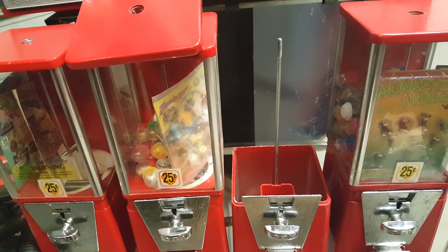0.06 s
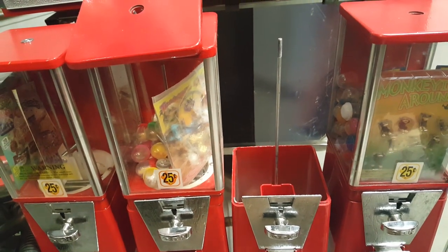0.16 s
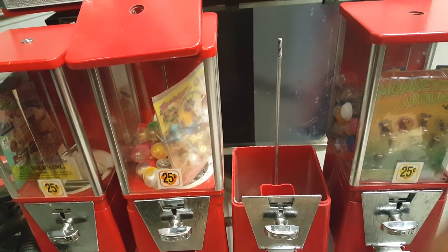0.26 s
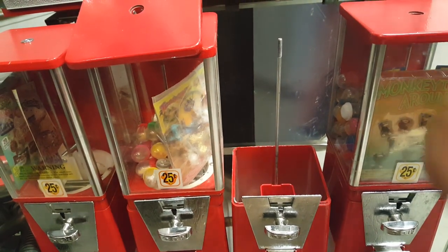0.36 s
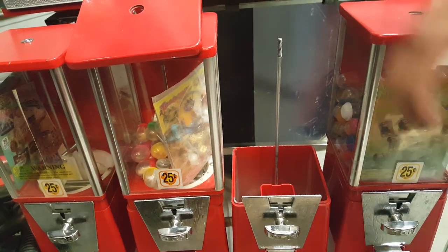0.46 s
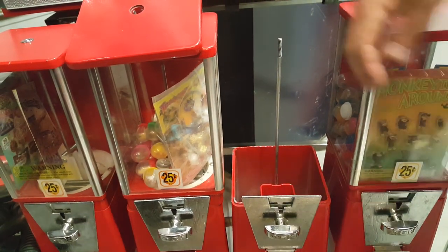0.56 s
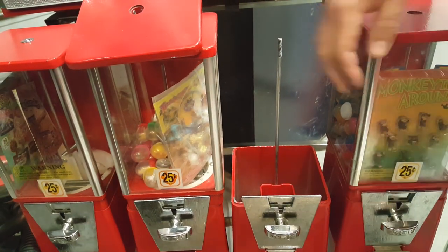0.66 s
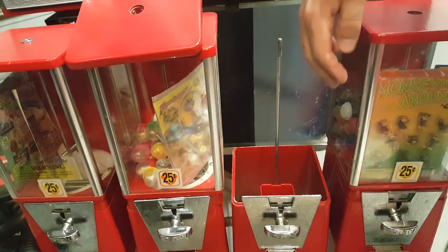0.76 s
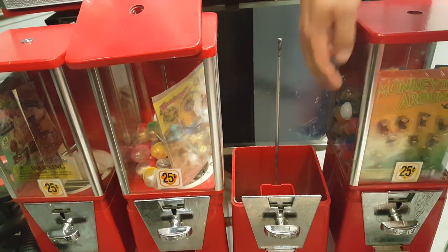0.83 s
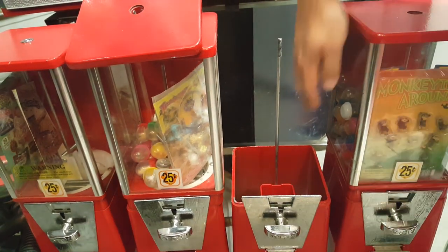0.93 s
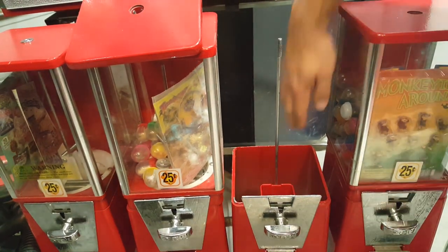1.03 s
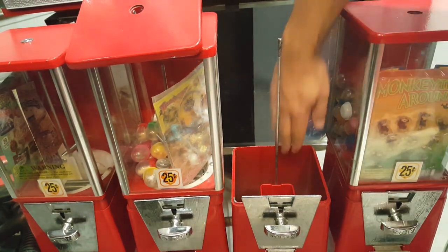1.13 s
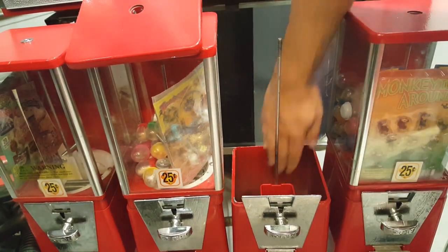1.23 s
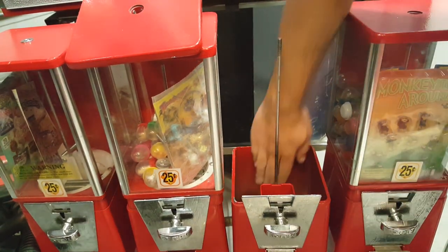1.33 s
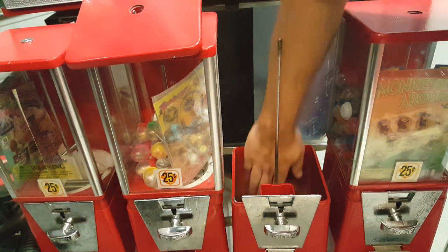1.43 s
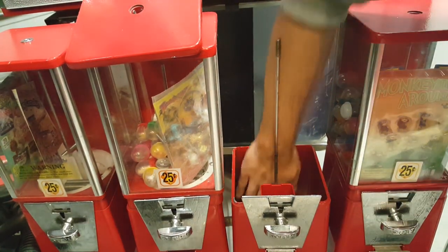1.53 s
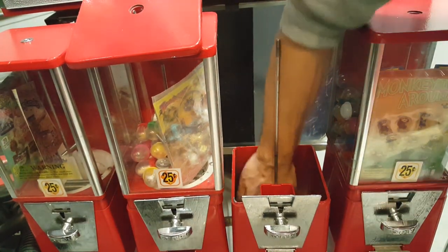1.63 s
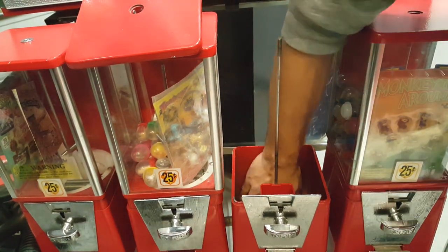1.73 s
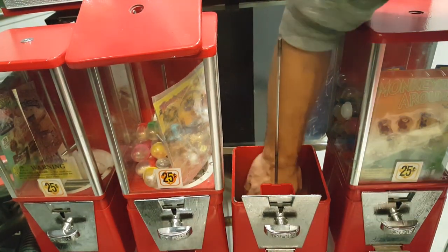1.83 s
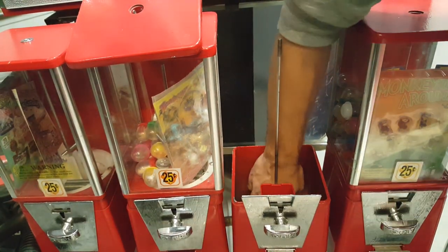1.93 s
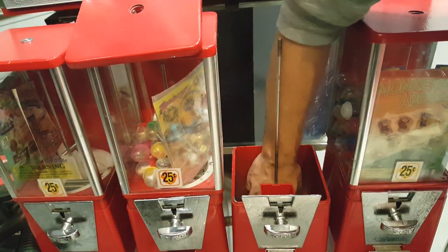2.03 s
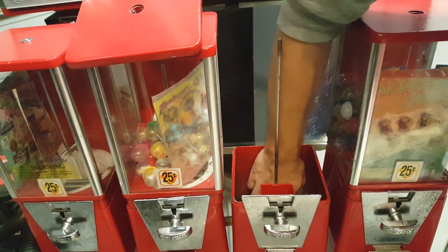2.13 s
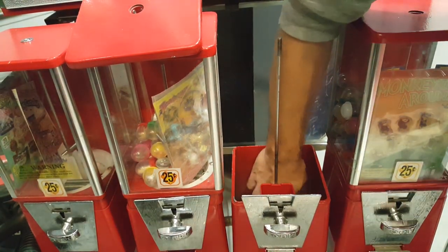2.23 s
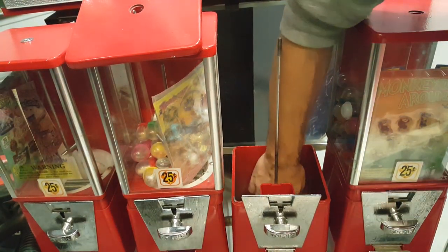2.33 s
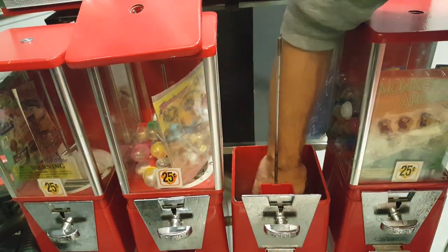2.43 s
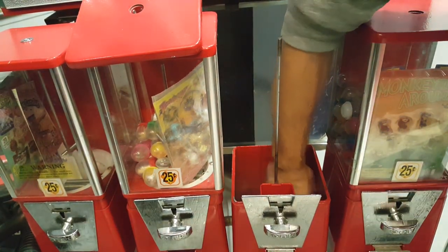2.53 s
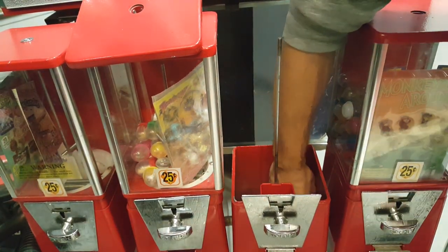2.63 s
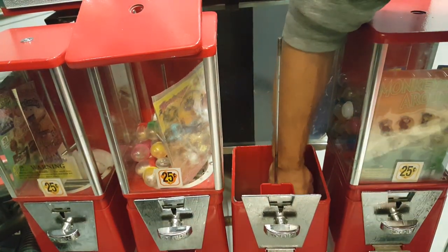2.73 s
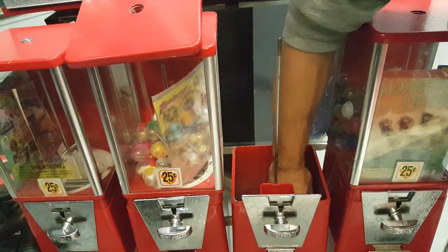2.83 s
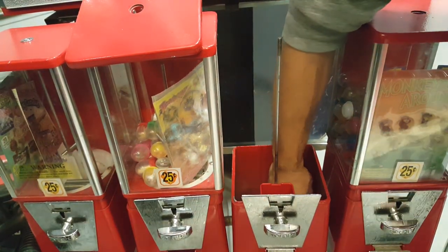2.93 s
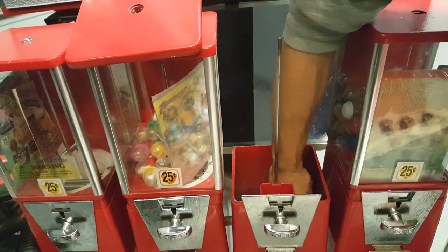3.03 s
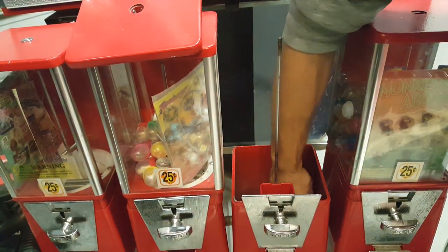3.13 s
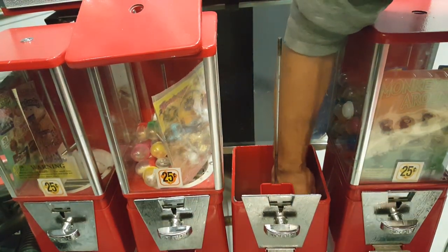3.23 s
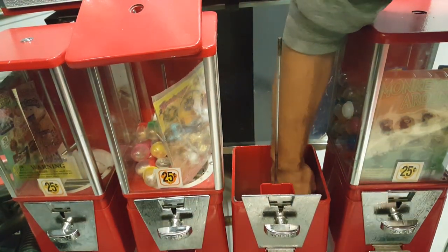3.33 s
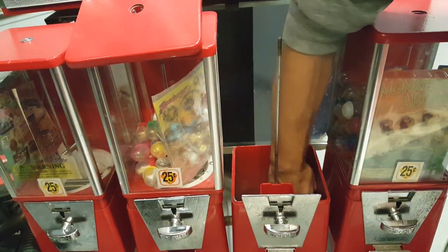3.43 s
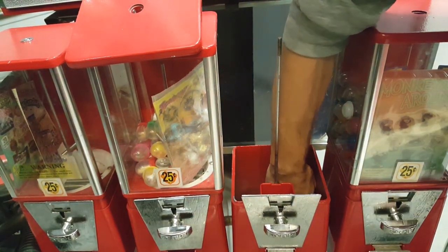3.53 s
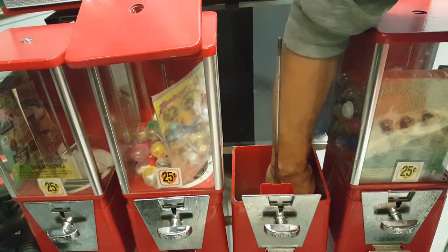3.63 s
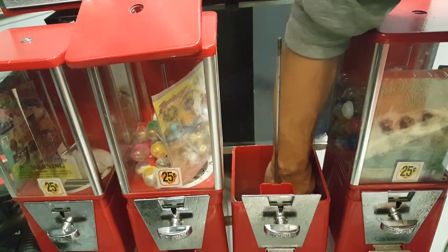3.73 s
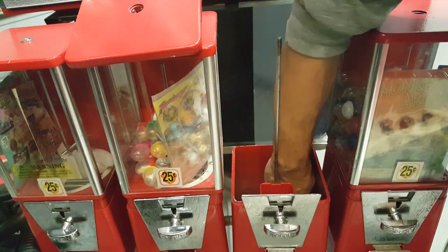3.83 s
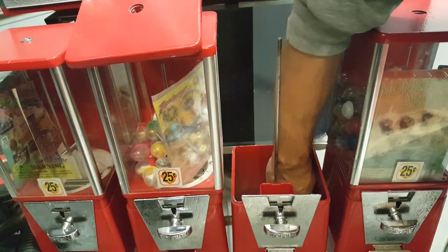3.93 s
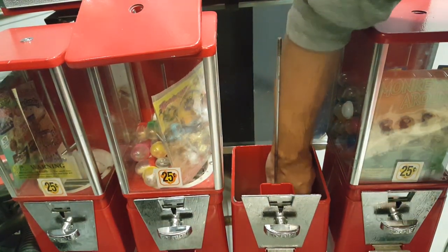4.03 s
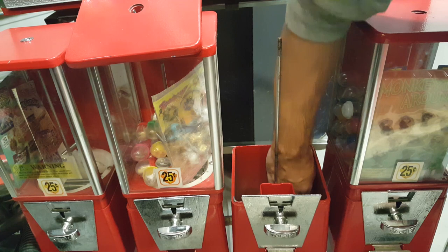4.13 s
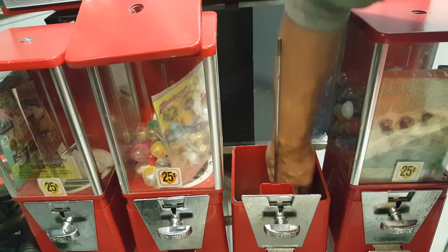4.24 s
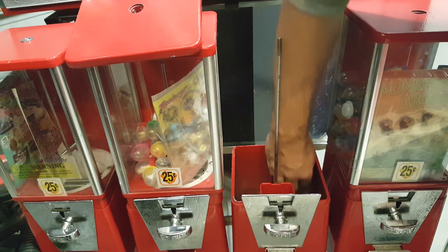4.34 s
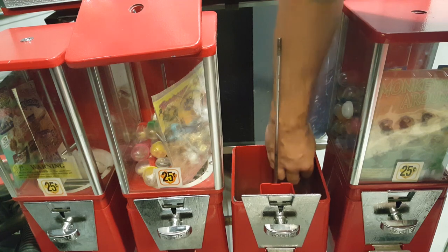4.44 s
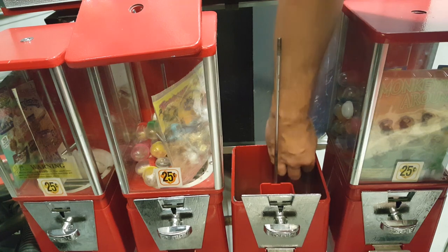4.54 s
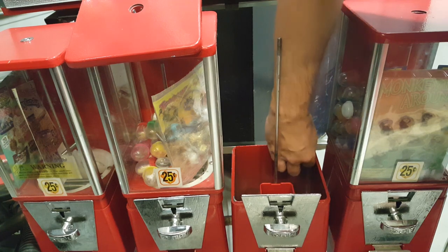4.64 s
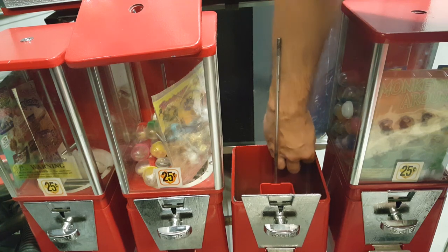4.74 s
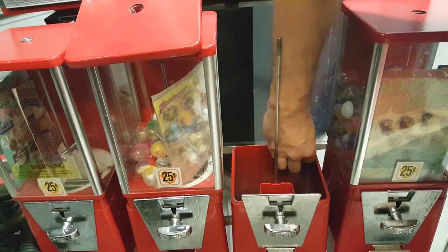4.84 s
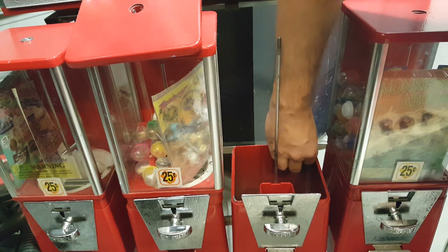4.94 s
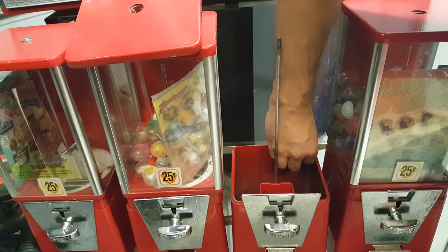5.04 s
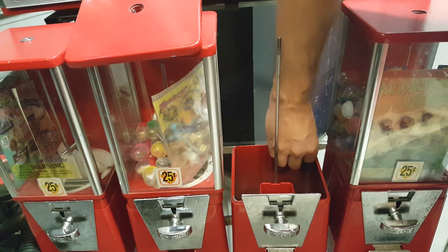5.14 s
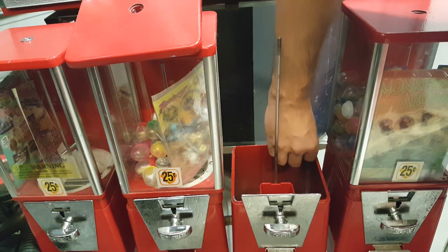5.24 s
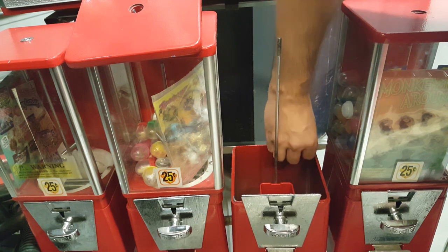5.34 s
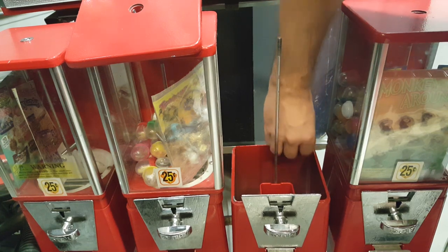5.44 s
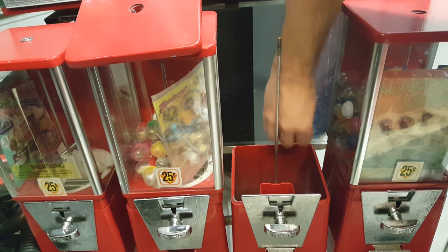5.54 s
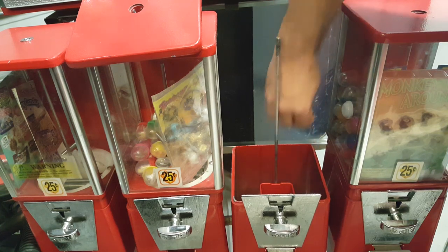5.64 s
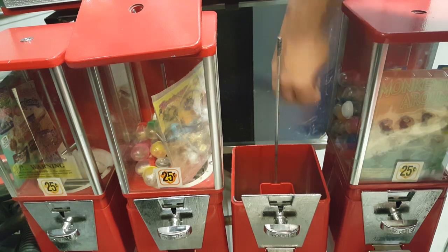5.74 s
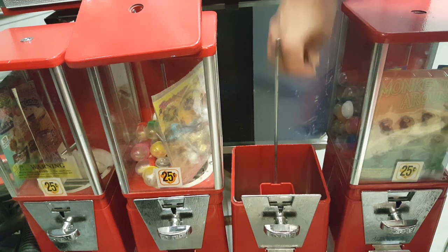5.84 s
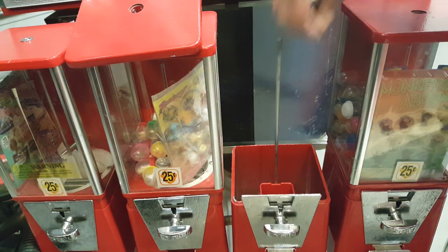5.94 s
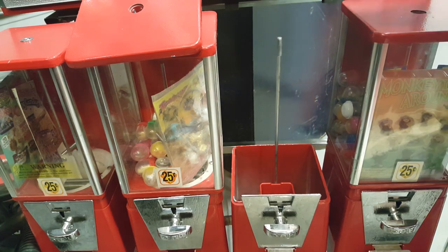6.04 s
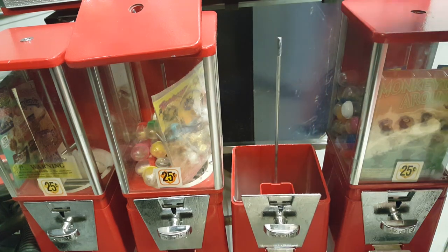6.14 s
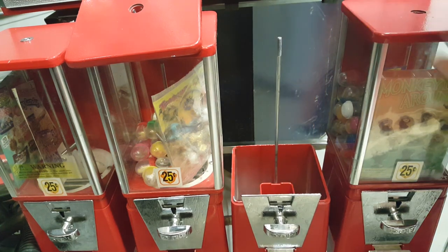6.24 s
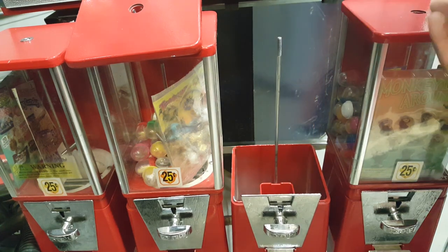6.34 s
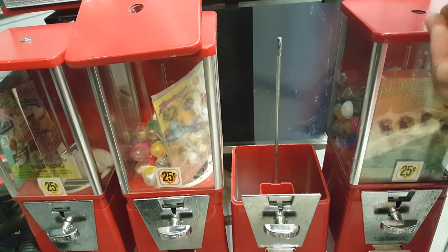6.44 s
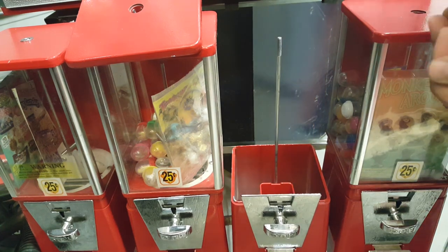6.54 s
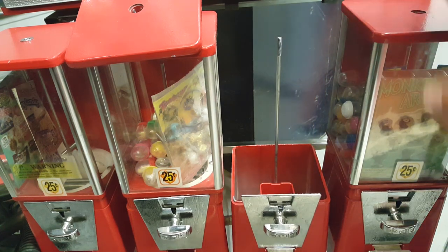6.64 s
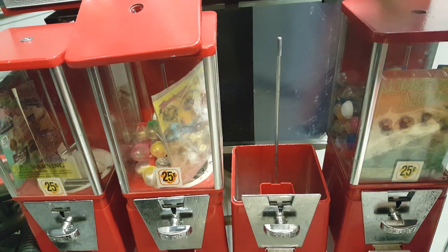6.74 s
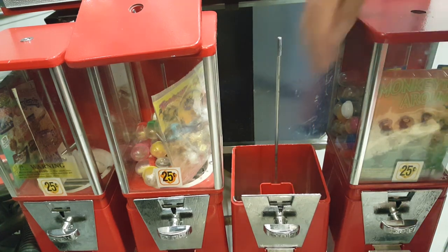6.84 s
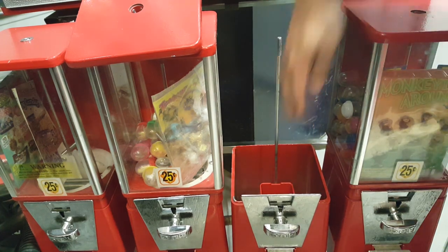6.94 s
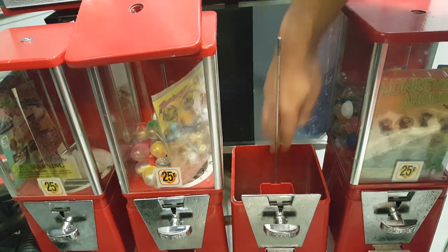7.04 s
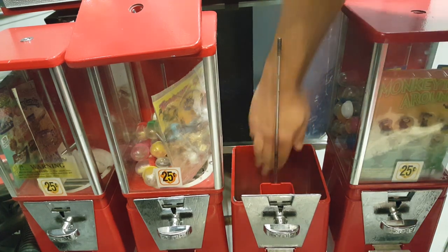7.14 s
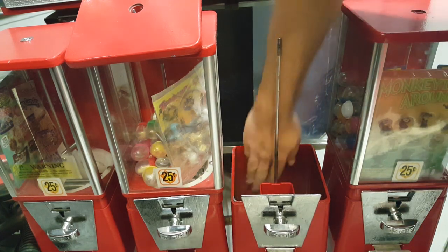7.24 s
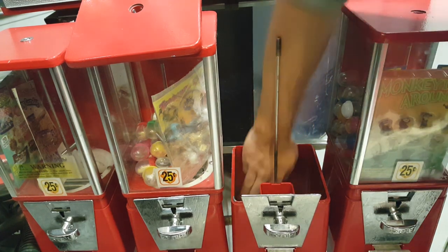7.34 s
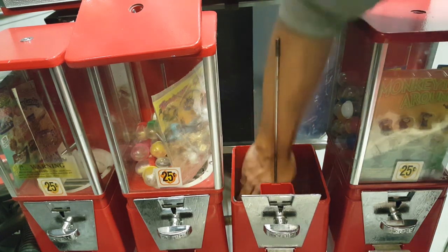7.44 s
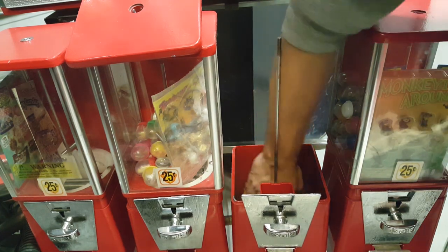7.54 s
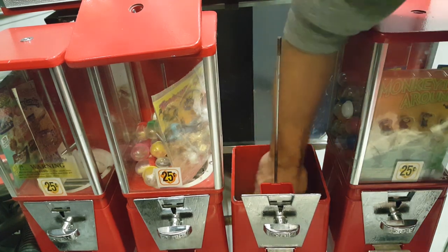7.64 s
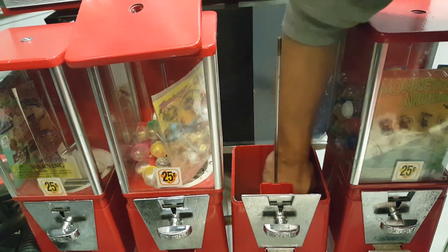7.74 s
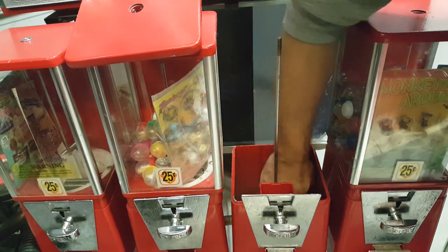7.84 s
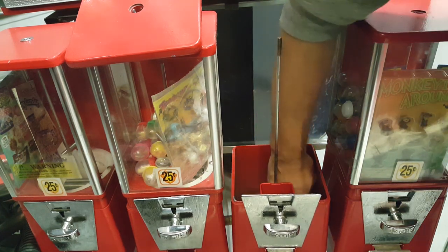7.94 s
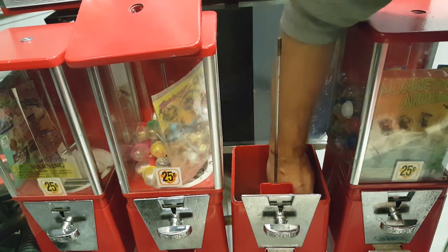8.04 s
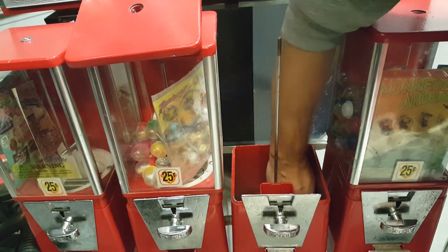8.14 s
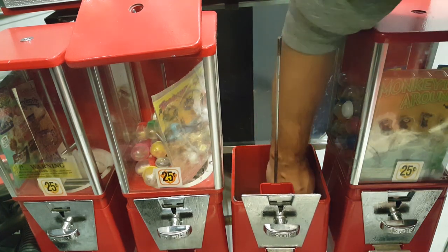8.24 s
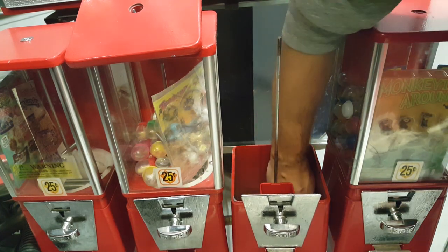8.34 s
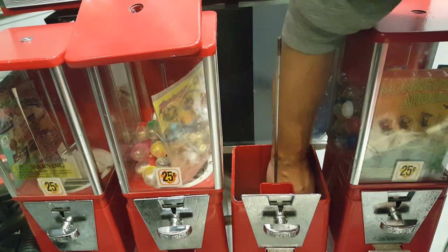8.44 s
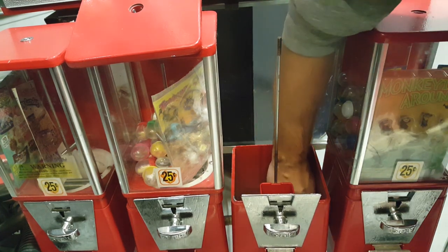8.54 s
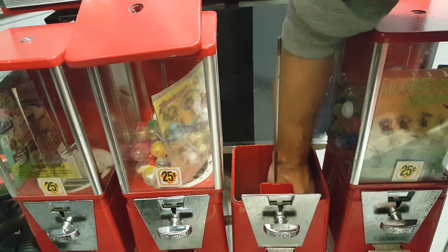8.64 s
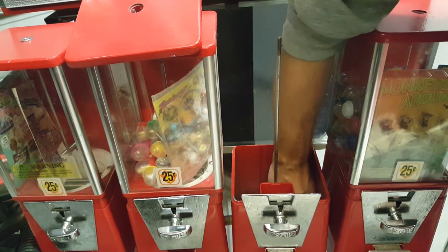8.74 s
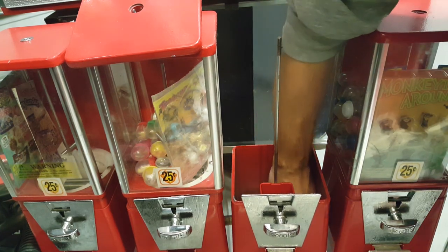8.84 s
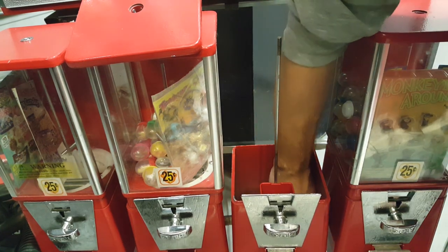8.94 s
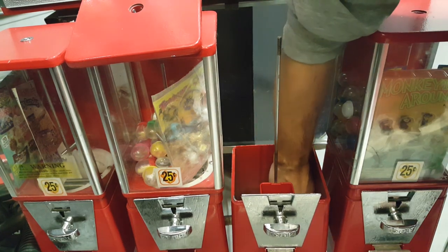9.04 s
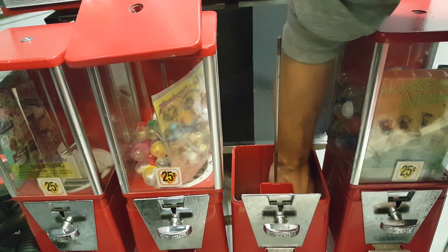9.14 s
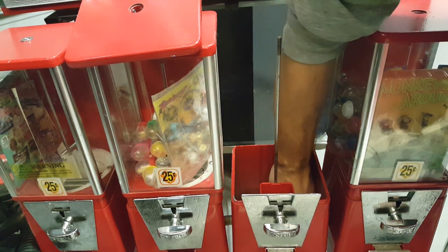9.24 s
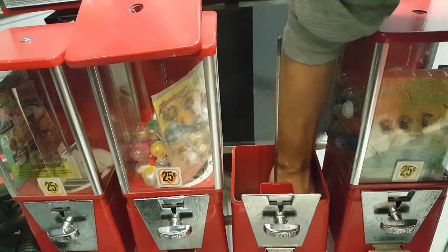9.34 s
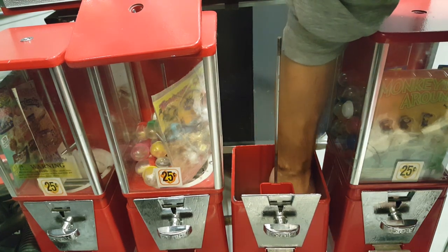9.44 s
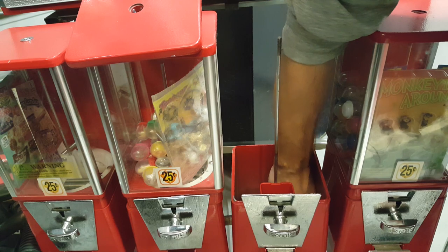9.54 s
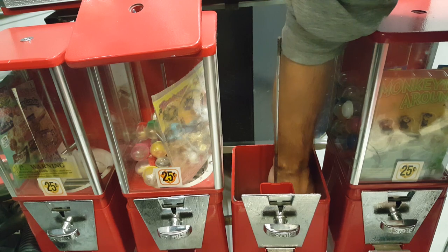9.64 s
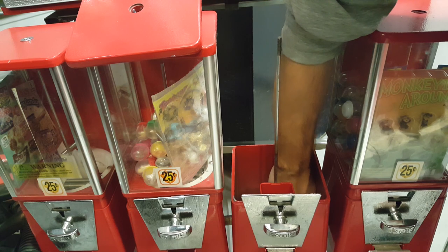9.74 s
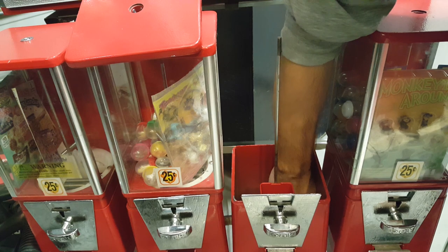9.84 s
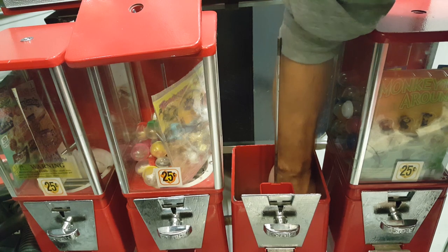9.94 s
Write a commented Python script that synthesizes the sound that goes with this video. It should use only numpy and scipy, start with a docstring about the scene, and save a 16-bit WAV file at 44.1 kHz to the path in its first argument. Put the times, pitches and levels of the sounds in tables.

```python
"""Raking coins in a vending machine

A hand rakes coins in a plastic hopper: each push swells, then the pile settles. A fistful rises, is dumped into
a tub, a few loose coins jingle, and the hand digs in again. Noise bursts with short tones make damped contacts;
streams and blows of them drive resonant bodies. Free coins and a brushed rod ring as decaying sines; cloth
rustles and whistles, soft bumps thud, and faint room air lies beneath."""
import sys
import numpy as np
from scipy import signal
from scipy.fft import rfft, irfft, next_fast_len
from scipy.io import wavfile
from scipy.ndimage import uniform_filter1d, minimum_filter1d, map_coordinates

SR = 44100
rng = np.random.default_rng(int(sys.argv[2]) if len(sys.argv) > 2 else 0)


def dump(signal):
    """Clip the signal to [-1, 1] and save it as 16-bit WAV at the path in sys.argv[1]."""
    limited = np.clip(np.atleast_2d(signal).T, -1, 1)
    pcm = np.round(limited * 32767).astype(np.int16)
    wavfile.write(sys.argv[1], SR, pcm)


N = 440118
TIME = np.arange(N) / SR  # seconds


def amp(db):
    """Decibels to gain."""
    return 10 ** (np.asarray(db) / 20)


def unit(x):
    """Scale to rms 1."""
    return x / np.sqrt(np.mean(x ** 2) + 1e-20)


def along(points, hz):
    """Interpolate (Hz, value) points on a log frequency axis."""
    f, value = np.transpose(points)
    return np.interp(np.log(hz + 1), np.log(f + 1), value)


def add(track, s, sound):
    """Mix a sound into a track at time s, cut off at the track's end."""
    part = track[..., max(0, round(s * SR)):][..., :sound.shape[-1]]
    part += sound[..., :part.shape[-1]]


def curve(times, db):
    """Gain following a dB curve, silent outside its span."""
    return amp(np.interp(TIME, times, db, left=-150, right=-150))


def hopper():
    """Hand and raked coins drum on the hopper; its resonances shift as the hand turns in it and rises out of it."""
    # coins snapping against the pile, and the hand touching or knocking on the hopper:
    # t/s, relative edge level/dB, drumming over the edge/dB, centre pitch of the clack f/Hz
    clacks = [(1.336, -27, -10, 1500), (1.7423, -18, -17, 1480), (1.8543, -9, -12, 2320),
              (1.9, -12, -14, 1170), (2.0317, -4.5, -10.5, 570), (2.1864, -9, -7, 1560),
              (2.276, -11.5, -17, 423), (2.3478, -18, -9.5, 1590), (2.4181, -8, -6, 850),
              (2.5393, 8.5, -10.5, 565), (2.7239, -17.5, -20, 1657), (2.7899, -17, -10, 2280),
              (2.831, -17, -11.5, 2130), (2.9089, -13.5, -11, 2580), (2.9311, -4, -8, 2480),
              (3.0176, -14.5, -12, 2326), (3.074, -16.5, -9, 1430), (3.1345, -9, -6.5, 2350),
              (3.1842, 2, -10, 1354), (3.4036, -23.5, 0, 1480), (3.702, -7.5, -4, 1375),
              (3.754, -10.5, -14, 1520), (3.8097, -16, -13, 1660), (3.8533, -7.5, -8.5, 1612),
              (3.912, -14, -2, 1463), (4.0726, -14.5, -34, 1600), (4.269, -10, -12.5, 1540),
              (4.578, -31.5, -11, 1620), (4.677, -37, -5, 1720), (4.8135, -26.5, -6.5, 2480),
              (4.967, -47, 2, 2850), (5.0, -40, 2.5, 2860), (5.064, -50.5, 10.5, 2530),
              (5.229, -51, 8.5, 890), (5.2616, -49.5, 6.5, 1770), (5.324, -51.5, 18.5, 584),
              (5.468, -50.5, 10.5, 2390), (7.1623, -39.5, -36, 3020), (7.213, -38.5, -26, 2280),
              (7.517, -42, 14.5, 1660), (7.566, -39.5, 12, 2280), (7.645, -17, -9.5, 1780),
              (7.6939, -16, 6, 1420), (7.908, -18, -9, 1520), (7.9744, -11.5, -10.5, 1537),
              (8.0168, -16, -7.5, 2240), (8.0453, -20.5, -14, 1980), (8.2155, -19.5, -0.5, 1720),
              (8.2626, -18, -6, 1320), (8.298, -21, -5, 2560), (8.3125, -2, -5.5, 2660),
              (8.6363, -15, 3.5, 2100), (8.6694, -11, -4, 1424), (8.7063, 3, -8, 2010),
              (8.9434, -18.5, -10, 1400), (9.0121, -6, -6.5, 2360), (9.2239, -16, -28, 1310),
              (9.268, -12.5, -15.5, 1590), (9.2865, -12.5, -20, 2760), (9.405, -37.5, 7.5, 1700),
              (9.4868, -17, -12, 1440), (9.5127, -27, 2.5, 1420), (9.5461, -17, -3.5, 1634),
              (9.574, -18.5, -5, 2680), (9.6395, -31, -16, 1470), (9.701, -24.5, -10, 1470),
              (9.728, -29, 3, 380), (9.7669, -17.5, -12, 1370), (9.7936, -11.5, -10.5, 1500),
              (9.8754, -14.5, -8, 1340), (9.919, -17, -9, 1570)]
    # broad colour of the coin pile: f/Hz, relative density/dB
    pile = [(30, -58.5), (90, -30.5), (280, -14), (1000, -27), (2500, -12), (4000, -14), (9000, -13),
            (12000, -13), (14500, -22.5), (16000, -27)]
    # cavity resonances with the hand deep in the hopper: f/Hz, width/Hz, relative level/dB
    deep_modes = [(385.6, 30, 0), (553, 31.6, -1), (861.6, 67, -1.5), (1400, 202, -1), (2020, 180, -10.5),
                  (2526, 380, -8.5), (5370, 210, -15.5), (6620, 220, -15.5)]
    # resonances with the fist raised: the cavity's, and two high rings of the held coins:
    # f/Hz, width/Hz, relative level/dB
    raised_modes = [(389, 88, 11), (572.6, 31, 17), (1150, 88, 4), (1543, 200, 4), (1690, 63, 4),
                    (2393, 79, 0), (2740, 180, -1.5), (3745, 74, -1), (6900, 40, -2), (11150, 38, -5)]
    # how far the fist is raised: t/s, share/0-1
    lift_points = [(3.4, 0.3), (3.9, 0.27), (4.5, 0.99), (5.6, 1), (7, 0)]
    raised_cut_hz = 470

    drum, edge = raking()
    stream = clatter(rate=440, spread_db=18, evenness=.7, clack_db=-7, ring_db=-3, scatter_db=-12)
    knock, snap = blows(clacks, t60=0.0088, clack_db=-10.0, rebound_db=-2.0, rebound_s=.002)
    low = amp(-2.5) * drum * stream + amp(20.0) * knock
    high = amp(-4) * edge * stream + amp(15.0) * snap
    # the turning hand covers more or less of the opening and detunes the cavity
    deep = gliding(low, high, body(pile, deep_modes))
    # coins lifted off the bottom no longer thump the hopper
    unloaded = signal.butter(2, raised_cut_hz, "high", fs=SR, output="sos")
    raised = sounded(low, high, signal.sosfilt(unloaded, body(pile, raised_modes)))
    lift = np.interp(TIME, *np.transpose(lift_points))
    return (1 - lift) * deep + lift * raised


def raking():
    """Drumming and edge gain of the moving coins: the strokes, the creeping pile and the held fistful."""
    # strokes and jolts of the hand among the coins:
    # start t/s, length of the push/s, relative drumming level at the crest/dB, coin edge over the drumming/dB
    strokes = [(1.738, 0.026, -29.5, 6), (1.845, 0.018, -27.5, 3.5), (1.9, 0.01, -18.5, 4),
               (1.95, 0.16, -25.5, 1), (2.18, 0.18, -26, 2.5), (2.4, 0.058, -18, 1.5),
               (2.52, 0.068, -21, 7), (2.932, 0.017, -29.5, -2), (3.118, 0.1, -21, 7),
               (3.4, 0.14, -25.5, 2.5), (3.57, 0.13, -39, 9), (3.68, 0.027, -21.5, 0.5),
               (3.81, 0.067, -23, 0), (3.94, 0.07, -22.5, -3.5), (4.15, 0.14, -22.5, -4),
               (4.32, 0.063, -24.5, -5.5), (7.643, 0.15, -18.5, 2.5), (8.18, 0.099, -29.5, -5),
               (8.313, 0.078, -16, 2), (8.7, 0.052, -13.5, 0.5), (8.943, 0.028, -23.5, 1.5),
               (9.01, 0.021, -19, 6), (9.12, 0.058, -31, 0), (9.245, 0.016, -28.5, 0),
               (9.49, 0.058, -32, -9), (9.728, 0.085, -30, -9), (9.873, 0.083, -30, -1)]
    # coins shifting in the closed fist as it rises: t/s, relative drumming level/dB
    fist = [(4.42, -41), (4.67, -39), (4.774, -51), (5.1, -61), (5.38, -55.5), (5.518, -70.5), (5.62, -82)]
    # between strokes the buried hand keeps the pile creeping: start t/s, stop t/s, relative level/dB
    creeping = [(1.76, 4.416, -42.5), (7.65, 9.98, -55)]
    fist_edge_db = -18.5  # the fingers muffle the coin edges

    held = curve(*np.transpose(fist))
    creep = sum(amp(db) * (TIME > start) * (TIME < stop) for start, stop, db in creeping)
    stroke_gains = pushes(strokes, catch_s=0.0032, swell_db=9, settle_db_per_s=184)
    return np.hypot(stroke_gains, creep) + held * amp([[0], [fist_edge_db]])


def pushes(table, catch_s, swell_db, settle_db_per_s):
    """Bass and treble gain of a run of strokes: each catches, swells to its crest and dies away."""
    power = np.zeros((2, N))
    t = TIME[:SR]
    for start, length, db, treble_db in table:
        swell = swell_db * (t / length - 1)
        settle = settle_db_per_s * (length - t)
        levels = np.minimum(swell, settle) + [[db], [db + treble_db]]
        catch = np.minimum(t / catch_s, 1)
        add(power, start, (catch * amp(levels)) ** 2)
    return np.sqrt(power)


def contact(t60, ring_db=-9, clack_db=-9, clack_hz=None, scatter_db=-9, count=6):
    """One damped contact: a crack scattered by the pile, the pitched clack of a stack, the brief ring of its coins."""
    t = np.arange(SR // 10) / SR
    # every coin is held differently, so each crack has its own broad peaks and dips
    colour = rfft(rng.standard_normal(len(t)))
    patches = np.interp(np.linspace(0, 1, len(colour)), np.linspace(0, 1, 26), rng.standard_normal(26))
    burst = irfft(colour * amp(4 * patches), len(t))
    # the first crack is bright; what the pile scatters after it has lost some of its top
    scatter = uniform_filter1d(burst, size=2) * amp(scatter_db - 60 * t / .06)
    crack = burst * amp(-60 * t / t60) + scatter
    rise = 1 - np.exp(-t / .0012)

    ring_hz = rng.uniform(2200, 14000, (count, 1))
    partials = rng.standard_normal((count, 1)) * np.sin(2 * np.pi * ring_hz * t)
    ring = partials.sum(0) * amp(-60 * t / .06)

    stack_hz = 1450 * 4 ** rng.random()
    pitch = (clack_hz or stack_hz) * np.exp(.06 * rng.normal())
    clack = np.sin(2 * np.pi * pitch * t) * amp(-60 * t / .035)
    sound = unit(rise * crack) + amp(ring_db) * unit(rise * ring) + amp(clack_db) * unit(rise * clack)
    return sound / np.linalg.norm(sound)


def clatter(rate, spread_db, evenness, clack_db, ring_db, scatter_db=-9, count=160):
    """A stream of random contacts (rate per second) of unequal strength among many coins, rms 1."""
    coins = [contact(.014, ring_db, clack_db, scatter_db=scatter_db) for _ in range(count)]
    draws = rng.random((12000, 3))
    times = np.cumsum(-np.log(1 - draws[:, 0])) / rate  # exponential waits
    stream = np.zeros(N)
    for s, (_, strength, which) in zip(times[times < N / SR], draws):
        add(stream, s, amp(spread_db * strength ** 2) * coins[int(which * count)])
    # the hand's steady push evens out the flow over tens of milliseconds
    flow = np.abs(uniform_filter1d(unit(stream) ** 2, size=1800)) + .02
    return unit(stream / flow ** (evenness / 2))


def blows(table, t60, clack_db, rebound_db, rebound_s, count=4):
    """Drumming and edge drives of single blows, each followed by quick rebounds."""
    drive = np.zeros((2, N))
    for s, db, drum_db, *pitch in table:
        blow = np.zeros(SR // 6)
        delays = np.cumsum(rng.uniform(.5, 2, count)) * rebound_s
        # flat, drumming blows are more pitched than edge-on ones
        tone_db = clack_db + 0.043 * drum_db
        clack_hz = pitch[0] if pitch else None
        for k, delay in enumerate(delays - delays[0]):
            hit = contact(t60, clack_db=tone_db, clack_hz=clack_hz)
            add(blow, delay, amp(k * rebound_db) * hit)
        add(drive, s, amp([[db + drum_db], [db]]) * blow / np.linalg.norm(blow))
    return drive


def body(spectrum, modes=(), size=8192):
    """Causal impulse response of a broad spectrum with resonances on it, energy 1."""
    hz = np.fft.rfftfreq(size, 1 / SR)
    power = amp(along(spectrum, hz)) ** 2
    for centre, width, db in modes:
        damping = hz * width
        power = power + (amp(db) * damping) ** 2 / ((centre ** 2 - hz ** 2) ** 2 + damping ** 2)
    # folding the cepstrum makes the response minimum-phase, so it starts at once
    cepstrum = irfft(np.log(power) / 2)[:size // 2]
    cepstrum[1:] *= 2
    response = irfft(np.exp(rfft(cepstrum, size)))[:size // 2]
    return response / np.linalg.norm(response)


def sounded(low, high, response, split_hz=3300):
    """Drive the bass and the treble of a body separately, each at unit power gain."""
    out = 0
    for drive, side in ((low, "low"), (high, "high")):
        half = signal.butter(2, split_hz, side, fs=SR, output="sos")
        part = signal.sosfilt(np.vstack([half, half]), response)
        out = out + signal.oaconvolve(drive, part / np.linalg.norm(part))[:N]
    return out


def gliding(low, high, response):
    """Sound a cavity whose resonances wander: it rings on a clock that runs a little fast or slow."""
    samples = np.arange(N)
    turn = .03 * np.tanh(map_coordinates(rng.standard_normal(99), [TIME * 9]))
    clock = np.cumsum(1 + turn - turn.mean())
    # warp the drives the opposite way, so the blows keep their times
    unwarped = np.interp(samples, clock, samples)
    drives = [map_coordinates(drive, [unwarped]) for drive in (low, high)]
    return map_coordinates(sounded(*drives, response), [clock])


def tub():
    """The fistful lands in a rush on the coins in a hollow tub; hollow knocks sound through the same body."""
    # the fistful pouring in: t/s, relative tub drumming level/dB, relative coin edge level/dB
    pour = [(5.78, -62, -79), (5.992, -28.5, -43.5), (6.0, -21, -22.5), (6.05, -20, -28.5),
            (6.2, -45.5, -54.5), (6.335, -68, -65)]
    # hollow knocks: the hand touching the hopper early on, then coins landing in the tub:
    # t/s, relative edge level/dB, drumming over the edge/dB
    hollow_knocks = [(1.3494, -22.5, 7), (5.931, -29, 12), (5.964, -22, 9), (5.9923, -7, -1),
                     (6.0228, -13.5, 5), (6.114, -22.5, 6)]
    # broad colour of coins in the tub: f/Hz, relative density/dB
    tub_pile = [(30, -35.5), (150, -38), (300, -9.5), (600, -5), (1500, -13), (3500, -21), (9000, -25.5),
                (12000, -28), (16000, -45)]
    # resonances of the tub: f/Hz, width/Hz, relative level/dB
    tub_modes = [(380, 27.5, 9.5), (745, 45, -1.5), (1228, 17, -2)]

    times, drum_db, edge_db = np.transpose(pour)
    stream = clatter(rate=500, spread_db=6.5, evenness=0.42, clack_db=-9.0, ring_db=-4)
    knock, snap = blows(hollow_knocks, t60=0.03, clack_db=-16.5, rebound_db=-4, rebound_s=0.0044)
    low = curve(times, drum_db) * stream + amp(16.5) * knock
    high = curve(times, edge_db) * stream + amp(12.0) * snap
    return sounded(low, high, body(tub_pile, tub_modes))


def jingle():
    """Loose coins slide and tick together and are free to ring at their own high modes."""
    # loose coins touching: t/s, relative level/dB, free ringing over it/dB
    touches = [(6.381, -34, -11), (6.4032, -24, -12.5), (6.459, -22, -25), (6.4778, -16.5, -28),
               (6.5188, -15.5, -26), (6.549, -21, -16), (6.564, -22, -28), (6.7175, -29.5, -7.5),
               (6.745, -20, -26), (6.7969, -20.5, -32), (6.92, -33.5, -41)]
    # loose coins sliding over each other: t/s, relative level/dB
    slides = [(6.33, -52), (6.39, -36), (6.55, -35), (6.6, -45), (6.7, -52), (6.75, -30), (6.84, -58)]
    # modes of freely ringing coins: centre f/Hz, relative level/dB, t60/s
    coin_modes = [(9480, 6, 0.085), (9200, -2, 0.12), (10200, -6, 0.07), (15000, 1, 0.11),
                  (15360, -10, 0.1)]
    # one coin rings alone until the next one stops it: start t/s, stop t/s, f/Hz, level/dB
    lone_coin = (6.52, 6.73, 8840, -30)
    # colour of loose coins: f/Hz, relative density/dB
    loose = [(300, -8), (1400, -17), (2300, -2.5), (5500, 4), (7500, 3.5), (9500, 12.5), (12000, 2),
             (16000, 2.5)]

    t = np.arange(SR // 3) / SR
    sliding = curve(*np.transpose(slides))
    ticks = sliding * clatter(rate=200, spread_db=16, evenness=0.5, clack_db=-28, ring_db=-12, scatter_db=-24)
    rings = np.zeros(N)
    swell = 1 - np.exp(-t / 0.0039)
    for s, db, free_db in touches:
        add(ticks, s, amp(db + 16) * contact(t60=.012, ring_db=-18, clack_db=-20, scatter_db=-20))
        for hz, level, t60 in coin_modes:
            detuned = hz * (1 + 0.0018 * rng.normal())
            ring_db = db + free_db + level + 14.0 + rng.normal(0, 1.5)
            add(rings, s, swell * amp(ring_db - 60 * t / t60) * np.sin(2 * np.pi * detuned * t))
    start, stop, hz, db = lone_coin
    held = np.clip(np.minimum(TIME - start, stop - TIME) / .01, 0, 1)  # 10 ms fades
    lone = held * amp(db) * np.sin(2 * np.pi * hz * TIME)
    return signal.oaconvolve(ticks, body(loose))[:N] + rings + lone


def clinks():
    """A freed coin rings at its own pitch and one overtone."""
    # coins that slip free and ring for a moment: t/s, level/dB, f/Hz
    freed = [(2.085, -32, 9250), (2.283, -15.5, 9280), (2.318, -22, 9300), (3.636, -26, 9660),
             (3.849, -18, 9500), (4.271, -23, 9240)]
    t60_s, overtone_ratio, overtone_db = 0.2, 1.66, -13

    t = TIME[:SR]
    rings = np.zeros(N)
    for s, db, hz in freed:
        phase = 2 * np.pi * hz * t
        tone = np.sin(phase) + amp(overtone_db) * np.sin(overtone_ratio * phase)
        add(rings, s, amp(db - 60 * t / t60_s) * tone)
    return rings


def rod():
    """The hopper's steel rod, brushed by the rising fist, sings briefly at two decaying modes."""
    # the touch: t/s, level/dB
    rod_touch = (5.469, -42.5)
    # modes of the rod: f/Hz, level over the touch/dB, t60/s
    rod_modes = [(1088, -7.5, 0.36), (1710, -0.5, 0.15)]

    s, db = rod_touch
    t = np.maximum(TIME - s, 0)
    return sum(amp(db + level - 60 * t / t60) * np.sin(2 * np.pi * hz * t) for hz, level, t60 in rod_modes)


def rustle():
    """Smooth cloth friction, with a cluster of thin gliding whistles that fades as the arm slows."""
    # brushes of cloth: start t/s, length/s, relative scuff level at the crest/dB, hiss over the scuff/dB
    brushes = [(.15, 0.051, -63, 6.5), (.32, 0.22, -52.5, -7), (.59, 0.0048, -34, -12.5),
               (.637, 0.0072, -38, -10), (.7, 0.098, -50.5, -9), (.905, 0.017, -46.5, 0),
               (1.0, 0.26, -49, -6.5), (1.345, 0.01, -38.5, -18.5), (7.3, 0.25, -58.5, -7)]
    # pitch of the whistle that glides with the rustle: t/s, f/Hz
    whistle = [(.36, 8550), (.44, 11900), (.49, 13000), (.55, 12100), (.68, 10100), (.82, 12200),
               (.95, 12600), (1.02, 10700), (1.14, 11900), (1.32, 11600)]
    # colour of the cloth: f/Hz, relative density/dB
    cloth = [(35, -26), (123, -16), (343, 2), (572, -5), (1230, -11), (2900, -24), (8870, -38.5),
             (15500, -47)]
    # where the sleeve's hiss centres: f/Hz, width/Hz, relative level/dB
    sleeve_hiss = (4600, 740, -39)
    whistle_db, fade_db_per_s = -62.5, 2

    scuff, hiss = pushes(brushes, catch_s=0.0034, swell_db=1.0, settle_db_per_s=74)
    noise = rng.standard_normal(N)
    friction = sounded(scuff * noise, hiss * noise, body(cloth, [sleeve_hiss]))

    s, hz = np.transpose(whistle)
    pitch = uniform_filter1d(np.interp(TIME, s, hz), size=SR // 28)
    lines = 0
    for ratio in (.75, .83, 1, 1.19):
        jittered = ratio * pitch + 700 * rng.standard_normal(N)  # Hz, roughens each line
        lines = lines + np.sin(2 * np.pi * np.cumsum(jittered) / SR)
    active = (TIME > s[0]) * (TIME < s[-1])
    fade = amp(whistle_db - fade_db_per_s * (TIME - s[0]))
    return friction + uniform_filter1d(active * fade, size=SR // 10) * unit(lines)


def bumps():
    """Dull thuds of decaying noise on the machine and the hopper's floor; the machine also sways at 70 Hz."""
    # soft bumps on the machine: t/s, relative thud level/dB, relative low sway level/dB
    soft_bumps = [(0.813, -22, -27), (5.701, -47.5, -44.5), (5.898, -29.5, -41), (6.793, -47.5, -30)]
    # the hand presses the pile against the hopper's floor: t/s, relative thud level/dB
    thumps = [(1.905, -30), (2.587, -25), (3.196, -26.5), (3.857, -24), (4.275, -37.5), (7.786, -22),
              (8.181, -39), (8.422, -28), (8.749, -26), (9.034, -27)]
    # colour of a thud: f/Hz, relative density/dB
    thud = [(30, -20.5), (70, 3), (140, 6.5), (330, 9.5), (900, -2.5), (2500, -13.5), (5000, -37.5),
            (16000, -59)]

    t = np.arange(SR // 6) / SR
    knocks, sway = np.zeros(N), np.zeros(N)
    for s, db, *_ in [*soft_bumps, *thumps]:
        add(knocks, s, amp(db + 6.5 - 60 * t / 0.022) * rng.standard_normal(len(t)))
    swing = (1 - np.exp(-t / .015)) * np.sin(2 * np.pi * 70 * t)
    for s, _, sway_db in soft_bumps:
        add(sway, s, amp(sway_db + 9 - 60 * t / .07) * swing)
    return signal.oaconvolve(knocks, body(thud))[:N] + sway


def room(x):
    """The shop's answer: a noise tail, 5 ms late, in which each frequency dies at its own speed."""
    # reverberation: f/Hz, t60/s
    decay = [(150, 0.66), (1500, 0.38), (6000, 0.36), (14000, 0.036)]

    hz, t, z = signal.stft(rng.standard_normal(SR // 2), SR, nperseg=256)
    tail = signal.istft(z * amp(-60 * t / along(decay, hz)[:, None]), SR, nperseg=256)[1]
    return signal.oaconvolve(x, np.pad(tail / np.linalg.norm(tail), (SR // 200, 0)))[:N]


def quiet_air():
    """Steady noise in the colour of the room's air, rms 1."""
    # colour of the air: f/Hz, relative density/dB
    air_colour = [(15, -37), (25, -10.5), (126, -5), (289, -10), (582, -17.5), (2850, -30.5), (9300, -34),
                  (15500, -40.5)]
    return unit(signal.oaconvolve(rng.standard_normal(N), body(air_colour))[:N])


def scene():
    """Coins sound in the room, over its quiet air; the close jingle and cloth stir it less, and the bumps stay dry."""
    boxed = hopper() + rod() + tub()
    close = jingle() + clinks() + rustle()
    reverb = room(amp(-10.0) * boxed + amp(-15.0) * close)
    return (boxed + close + reverb + bumps() + amp(-59.5) * quiet_air())[None]


def record(dry):
    """A limiter holds the loudest peaks down; a steep low-pass then closes off the top of the band."""
    top_hz = 16150
    needed = np.minimum(1, amp(-10) / (np.abs(dry) + 1e-9))
    # hold each reduction around its peak, then smooth it
    gain = uniform_filter1d(minimum_filter1d(needed, size=300), size=200)
    size = next_fast_len(N + SR // 2, True)
    hz = np.fft.rfftfreq(size, 1 / SR)
    return irfft(rfft(dry * gain, size) / (1 + (hz / top_hz) ** 200), size)[:, :N]


dry = scene()
out = record(dry)
dump(out)
```